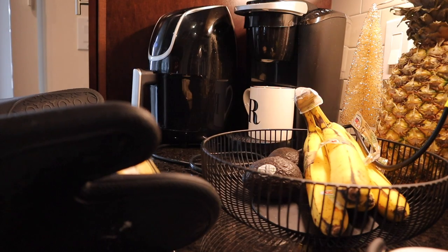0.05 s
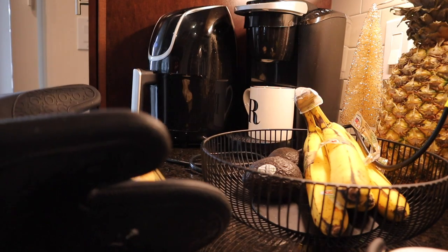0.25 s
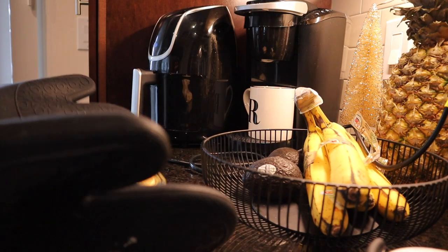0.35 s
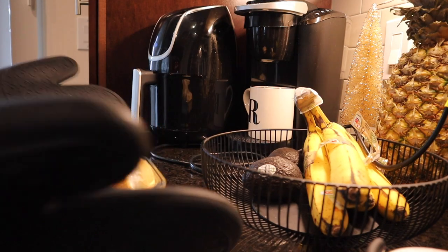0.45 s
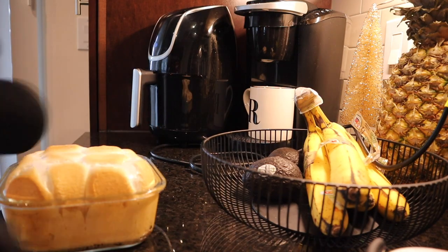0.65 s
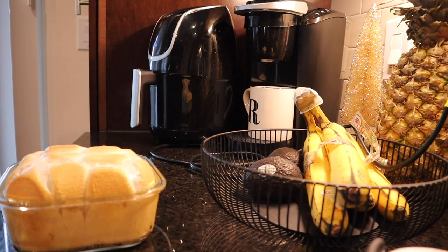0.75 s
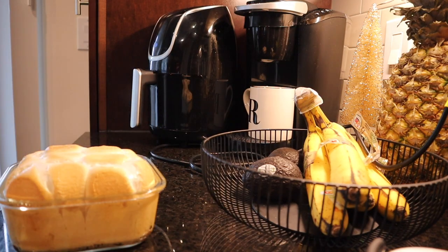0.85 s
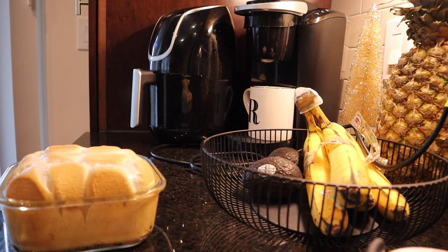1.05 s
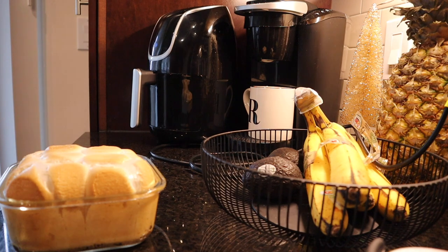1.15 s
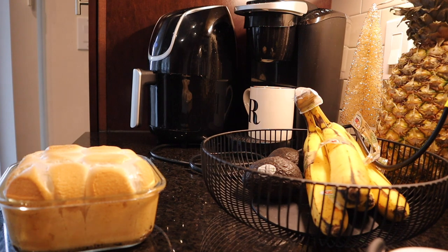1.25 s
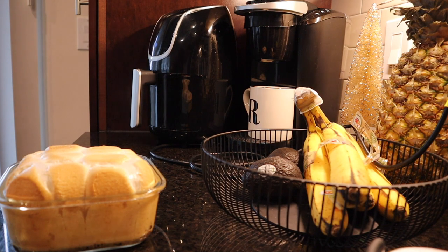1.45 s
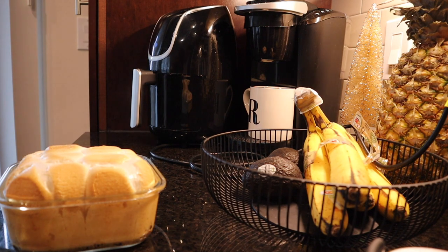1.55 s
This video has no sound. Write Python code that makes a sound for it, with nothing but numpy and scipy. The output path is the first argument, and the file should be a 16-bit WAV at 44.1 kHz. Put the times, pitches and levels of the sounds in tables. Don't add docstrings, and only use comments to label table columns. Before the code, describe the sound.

Quiet appliance rumble and faint mains hum, then at 0.2 s a heavy glass dish hits a stone counter: one loud, sharp, slightly clipped knock with a short glassy ring. The bright kitchen tail is squashed briefly, swells back near 0.28 s and fades by about 0.9. A small hard plastic tick comes at 0.92, soft gloved bumps near 1.13, then very faint rustles and cloth swish until about 1.6.

```python
import sys
import numpy as np
from scipy import signal
from scipy.io import wavfile
from scipy.ndimage import uniform_filter1d

SR = 44100
rng = np.random.default_rng(int(sys.argv[2]) if len(sys.argv) > 2 else 0)


def invert_db(level):
    return 10 ** (np.asarray(level, dtype=float) / 20)


def master(y):
    cut = np.clip(np.atleast_2d(y).T, -1, 1)
    pcm = np.round(cut * 32767)
    wavfile.write(sys.argv[1], SR, pcm.astype(np.int16))


N = 70560

# start_s, level_db
FOOT_CONTACTS = [
    (0.205, 2),
    (0.2072, -2.5),
    (0.2074, -13),
    (.2094, -15.5),
]
GLASS_PITCHES = [802, 1228, 1365, 1705, 2540, 3405, 3870, 5320, 7050, 7950, 9350, 9825, 11400, 11960]
# direct_db, t60_s, room_db
GLASS_MODES = [(-9, 0.12, -9.5), (-4.5, 0.16, -14), (-6, 0.14, -19.5), (-5, 0.16, -12.5), (-5, 0.11, -4.5),
               (-11, 0.21, -16.5), (-6, 0.043, -12.5), (-8.5, 0.072, -5.5), (-30, 0.16, -17),
               (-14.5, 0.058, -13), (-24, 0.16, -18), (-13, 0.18, -25.5), (-22, .12, -23), (-23, .12, -17)]
SLAB_PITCHES = [124, 310, 420, 1480, 1850, 2810, 4845, 8300, 12570, 14170]
# direct_db, t60_s, room_db
SLAB_MODES = [(-18, 0.19, -2), (-29, 0.059, -46), (-11, 0.027, 1), (-24, 0.032, -9.5), (-22, 0.1, -7.5),
              (-1, 0.068, -7.5), (-8, .05, -9.5), (-17.5, 0.062, -10), (-13, 0.092, -17), (-30, .08, -28)]
# frequency_hz, level_db
CRACK_COLOUR = [(100, -35), (350, -1), (900, -0.5), (1600, 4.5), (3000, -6), (5500, -9.5), (9500, -17),
                (16000, -47)]
# frequency_hz, level_db
KNOCK_WASH = [(100, -3), (250, -13), (600, -9.5), (1400, 0), (2200, -5), (4000, -8), (8500, -19),
              (15000, -41)]
# delay_s, level_db
NEAR_ECHOES = [(.0031, -44), (.0056, -46), (.0087, -22), (.0132, -9.5), (.0178, -11)]
# frequency_hz, t60_s
KITCHEN_T60 = [(100, 0.29), (400, 0.66), (1500, 0.91), (4000, 0.83), (8000, 0.67), (15000, .5)]
# start_s, level_db
TICK_SNAPS = [
    (.9203, 4.5),
    (.921, 4),
]
# pitch_hz, level_db, t60_s
TICK_MODES = [(900, -2, 0.0046), (1330, -13.5, 0.0085), (2400, -11.5, 0.0053), (4130, -8, .005),
              (4630, -2.5, 0.0031), (5310, -6.5, 0.0079), (6800, -8, .004)]
# frequency_hz, level_db
TICK_COLOUR = [(200, -7), (800, -8), (2000, -8.5), (4000, -7.5), (6000, -8.5), (8000, -14), (11000, -28),
               (16000, -43)]
# low_hz, high_hz
TICK_BAND = [350, 9000]
# start_s, level_db
HAND_BUMPS = [
    (.9795, -41),
    (1.1305, -32.5),
    (1.1375, -31.5),
    (1.143, -33),
]
# pitch_hz, level_db, t60_s
PAD_MODES = [(442, 0.5, 0.017), (764, 0.5, 0.02), (1300, -8, 0.015)]
# start_s, decay_s, level_db, centre_hz, width_hz
RUSTLE_PUFFS = [
    (1.135, 0.019, -52, 3970, 6000),
    (1.23, 0.009, -53, 4610, 5000),
    (1.375, 0.0082, -50, 4500, 3000),
    (1.412, .012, -48, 5450, 6960),
    (1.437, .007, -49, 5330, 5000),
    (1.524, .008, -54, 3360, 2000),
]
# time_s, level_db
CLOTH_LEVEL = [(.6, -75), (.74, -53.5), (.89, -59.5), (1.0, -58), (1.14, -53.5), (1.2, -66), (1.4, -65),
               (1.6, -60.5)]
# frequency_hz, level_db
CLOTH_SPECTRUM = [(500, -34), (1600, 10), (3000, -1), (6000, 2), (10000, -6.5), (16000, -11)]
# frequency_hz, level_db
AIR_COLOUR = [(25, -1), (60, -7.5), (120, -3.5), (400, -5), (1000, -14), (2500, -25), (5000, -31),
              (16000, -37)]
# pitch_hz, level_db
MAINS_HUM = [(59.2, -66), (118.4, -62)]
# time_s, gain_db
LIMITER_GAIN = [(0.206, -1), (0.213, -6), (.222, -9.5), (0.231, -16), (.245, -16.5), (0.261, -15),
                (0.283, -4.5), (.36, -3.5), (.5, -3), (.72, -0.5)]


def dish():
    twin_split_hz, twin_db, knock_db = 44.7, -1.5, -8.5
    room_modes_db, wash_db = -3.5, -17.5
    glass = np.array(GLASS_MODES)
    twins = glass + [twin_db, 0, twin_db]
    hz = np.r_[GLASS_PITCHES, np.array(GLASS_PITCHES) + twin_split_hz, SLAB_PITCHES]
    db, t60, room_db = np.r_[glass, twins, SLAB_MODES].T

    knock = strike(FOOT_CONTACTS, invert_db(knock_db) * ring(zip(hz, db, t60)))
    crack = strike(FOOT_CONTACTS[:1], burst(CRACK_COLOUR, db=-1, t60=0.043))

    flat_tail = kitchen([(100, 0.0066), (15000, 0)])
    room_ring = ring(zip(hz, room_db, 0.38 * t60))
    blurred = signal.fftconvolve(room_ring, flat_tail / np.linalg.norm(flat_tail))[:N]
    room = invert_db(room_modes_db) * blurred + invert_db(wash_db) * kitchen(KNOCK_WASH)

    whole = echoed(knock + crack) + strike(FOOT_CONTACTS[:1], room)
    return signal.sosfilt(signal.butter(4, 85, "high", fs=SR, output="sos"), whole)


def strike(hits, body):
    contact_s = 0.00002
    t = np.arange(N) / SR
    pushes = sum(invert_db(db) * np.exp(-0.5 * ((t - s) / contact_s) ** 2) for s, db in hits)
    pushes = pushes / (contact_s * SR * np.sqrt(2 * np.pi))
    return signal.fftconvolve(pushes, body)[:N]


def ring(modes):
    t = np.arange(SR // 2) / SR
    return sum(invert_db(db - 60 * t / max(t60, 0.003)) * np.sin(2 * np.pi * hz * t) for hz, db, t60 in modes)


def burst(colour, db, t60):
    t = np.arange(SR // 2) / SR
    noise = evened(shaped(len(t), lambda hz, s: invert_db(read(colour, hz) + 0 * s)))
    return noise * invert_db(db - 60 * t / t60)


def echoed(x):
    near = np.zeros(SR // 10)
    near[0] = 1
    for k, (s, db) in enumerate(NEAR_ECHOES):
        near[round(s * SR)] = (-1) ** k * invert_db(db)
    return signal.fftconvolve(x, near)[:N]


def kitchen(colour):
    build_s = 0.004
    tail = shaped(N, lambda hz, s: invert_db(read(colour, hz) - 60 * s / read(KITCHEN_T60, hz)))
    build_up = 1 - np.exp(-np.arange(N) / SR / build_s)
    return tail * build_up / np.std(tail[:SR // 10])


def tick():
    direct_db, room_db, scatter_delay_s = -19.5, -49, 0.0024
    after = invert_db(room_db) * kitchen(TICK_COLOUR)
    add(after[round(scatter_delay_s * SR):], burst(TICK_COLOUR, db=-29.5, t60=0.053))
    direct = invert_db(direct_db) * strike(TICK_SNAPS, ring(TICK_MODES))
    whole = direct + strike(TICK_SNAPS[1:], after)
    return signal.sosfilt(signal.butter(2, TICK_BAND, "band", fs=SR, output="sos"), whole)


def bumps():
    return -strike(HAND_BUMPS, ring(PAD_MODES))


def rustles():
    rise_s = 0.00056
    out = np.zeros(N)
    t = np.arange(SR // 10) / SR
    for s, decay_s, db, hz, width in RUSTLE_PUFFS:
        grain_db = 13.6 * uniform_filter1d(rng.standard_normal(len(t)), size=40)
        noise = rng.standard_normal(len(t)) * invert_db(grain_db)
        r = np.exp(-np.pi * width / SR)
        poles = [1, -2 * r * np.cos(2 * np.pi * hz / SR), r * r]
        once = signal.lfilter([1, 0, -1], poles, noise)
        puff = evened(signal.lfilter([1], poles, once))
        envelope = (1 - np.exp(-t / rise_s)) * np.exp(-t / decay_s)
        start = round(s * SR)
        add(out[start:], (invert_db(db) * puff * envelope)[:N - start])
    return out


def cloth():
    s, db = np.transpose(CLOTH_LEVEL)
    flicker_db = 1.9 * evened(uniform_filter1d(rng.standard_normal(N), size=300))
    swish = evened(shaped(N, lambda hz, t: invert_db(read(CLOTH_SPECTRUM, hz) + 0 * t)))
    return swish * invert_db(np.interp(np.arange(N) / SR, s, db, left=-120) + flicker_db)


def air():
    frames, hz = N // 512 + 5, np.fft.rfftfreq(2048, 1 / SR)[:, None]
    a, b, patches = rng.standard_normal((frames, 1025, 3)).T
    patches = uniform_filter1d(patches, size=16, axis=0)
    patches = evened(uniform_filter1d(patches, size=6, axis=1))
    z = (a + 1j * b) * invert_db(read(AIR_COLOUR, hz) + 0.98 * patches)
    noise = evened(signal.istft(z, nperseg=2048, noverlap=1536)[1][:N])
    return invert_db(-43) * noise + hum()


def hum():
    t = np.arange(N) / SR
    out = np.zeros(N)
    for hz, db in MAINS_HUM:
        waver_db = 7.5 * np.sin(2 * np.pi * (rng.uniform(3.5, 5.8) * t + rng.random()))
        out += invert_db(db + 9.5 + waver_db) * np.sin(2 * np.pi * (hz * t + rng.random()))
    return out


def shaped(length, gain):
    frames, hz = length // 128 + 5, np.fft.rfftfreq(512, 1 / SR)[:, None]
    a, b = rng.standard_normal((frames, 257, 2)).T
    z = (a + 1j * b) * gain(hz, np.arange(frames) * 128 / SR)
    return signal.istft(z, nperseg=512, noverlap=384)[1][:length]


def read(points, hz):
    f, value = np.transpose(points)
    return np.interp(np.log(hz + 1), np.log(f + 1), value)


def evened(x):
    return x / np.sqrt(np.mean(x ** 2) + 1e-20)


def add(mix, sound):
    mix[:len(sound)] += sound


def scene():
    return (dish() + tick() + bumps() + rustles() + cloth() + air())[None]


def roll_off(x):
    return signal.sosfilt(signal.butter(12, 16220, fs=SR, output="sos"), x)


def record(dry):
    s, gain_db = np.transpose(LIMITER_GAIN)
    limited = dry * invert_db(np.interp(np.arange(N) / SR, s, gain_db))
    clipped = np.clip(limited, -1.0, 1.0)
    low_pass = signal.firwin(511, 16200, window=("kaiser", 9), fs=SR)
    mix = signal.oaconvolve(clipped, low_pass[None], "same")
    return roll_off(mix)


dry = scene()
out = record(dry)
master(out)
```